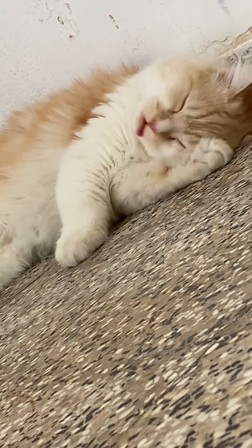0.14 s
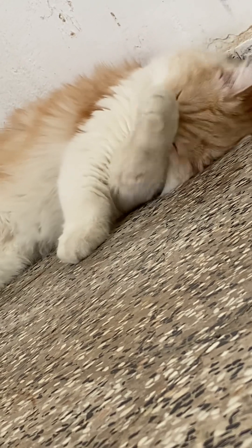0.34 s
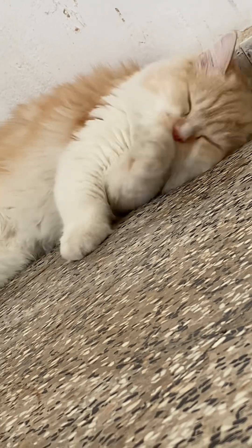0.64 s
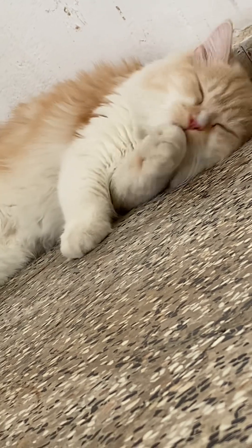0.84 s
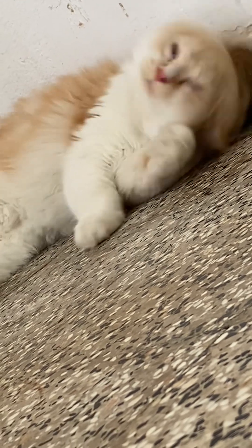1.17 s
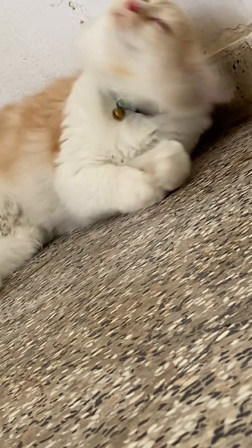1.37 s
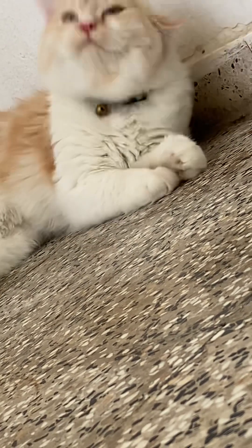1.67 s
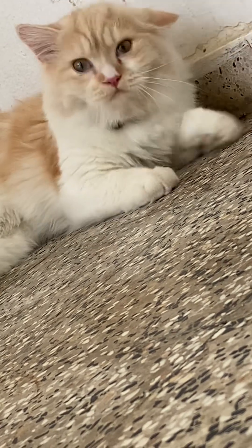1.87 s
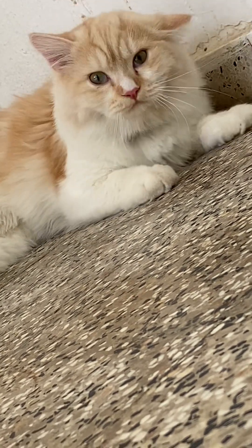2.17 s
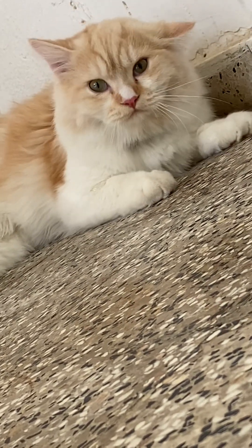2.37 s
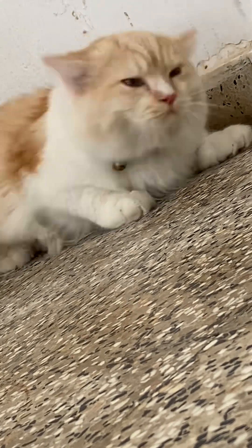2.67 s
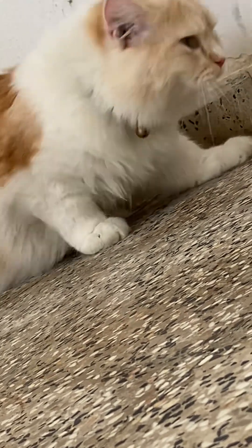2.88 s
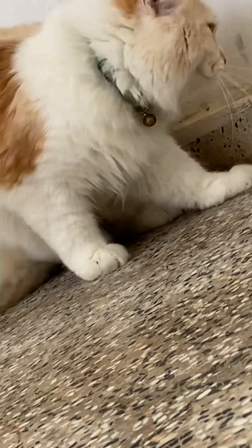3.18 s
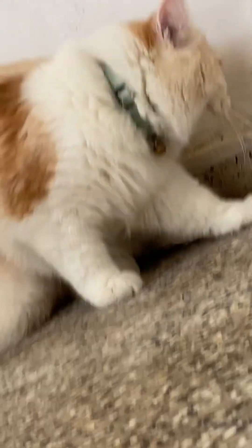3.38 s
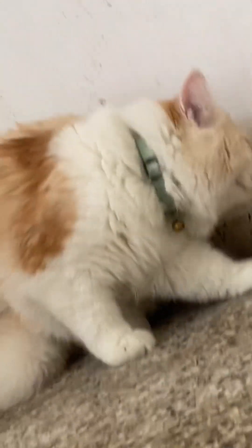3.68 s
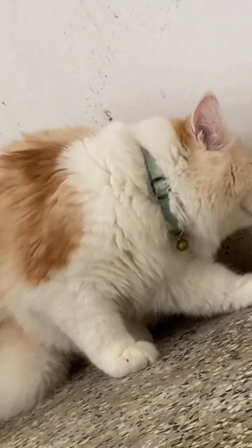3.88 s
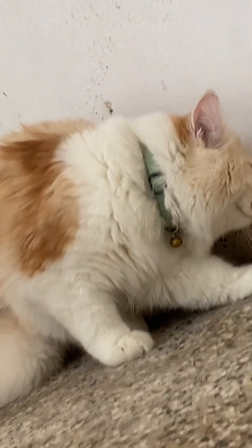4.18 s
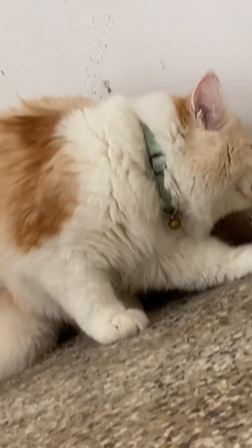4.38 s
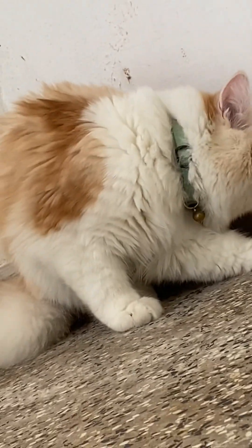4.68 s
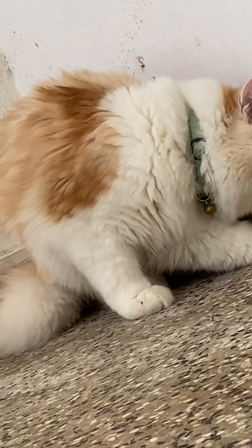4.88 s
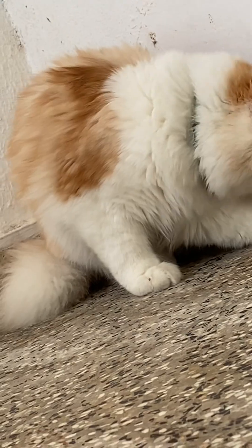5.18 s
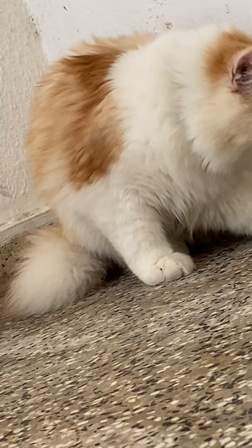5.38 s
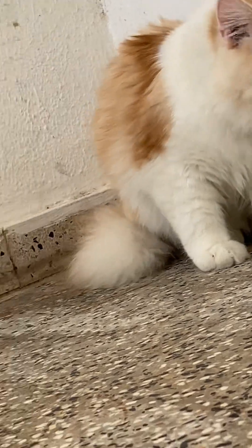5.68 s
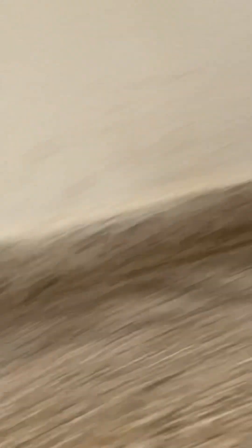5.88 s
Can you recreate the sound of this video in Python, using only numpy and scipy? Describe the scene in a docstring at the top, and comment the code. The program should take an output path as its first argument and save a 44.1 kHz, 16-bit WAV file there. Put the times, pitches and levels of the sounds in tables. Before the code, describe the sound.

Over a low town rumble with faint hiss, a cat's little bell rattles briefly, clinks again more softly, then gives only faint taps.

```python
"""Cat with a collar bell on a stone terrace

A cat close to a stereo microphone grooms itself, jerks its head up, then gets to its feet.
The pellet of its small bell taps and rolls in the brass shell: decaying modes with a fluttering ring.
The bell clacks on its ring as filtered clicks; fur and strap rustle as clumps of tiny noise snaps.
Walls throw the tinkle back as sparse echoes; far behind lie town rumble, machine drones, chirping and hiss."""
import sys
import numpy as np
from scipy import signal
from scipy.fft import rfft, irfft, next_fast_len
from scipy.io import wavfile

SR = 44100
rng = np.random.default_rng(int(sys.argv[2]) if len(sys.argv) > 2 else 0)


def generate_wav(sig):
    """Save sig (samples, or channels by samples) to the path in sys.argv[1] as 16-bit PCM at SR."""
    pcm = np.round(np.clip(np.atleast_2d(sig).T, -1, 1) * 32767).astype(np.int16)
    wavfile.write(sys.argv[1], SR, pcm)


N = 266584
TIME = np.arange(N) / SR
BINS = np.fft.rfftfreq(N, 1 / SR)
LOW_HZ = 4567  # lowest mode of the bell, also the pivot of each clack's brightness

# the bell knocks on its ring and buckle: (time [s], level [dB], brightness [dB per octave])
CLACKS = [(.744, -45, 0), (.926, -53, 0), (1.14, -35, -7), (1.2481, -25.5, -9), (1.266, -35, -1),
          (1.283, -37, 1), (1.303, -33, 4), (1.333, -36, -1), (1.355, -37, 5), (1.403, -33, -15),
          (1.415, -36, -3), (1.441, -38, 7), (1.5236, -5, 3.5), (1.5249, -19.5, -8.5), (1.532, -28, -1),
          (1.785, -41, -12), (2.779, -28, -2), (2.861, -48, 0), (3.068, -39, 0)]


def gain_of(db):
    """Decibels to a factor."""
    return 10 ** (np.asarray(db) / 20)


def evened(x):
    """Scales to rms 1."""
    return x / np.sqrt(np.mean(x ** 2) + 1e-20)


def read(points, hz):
    """Reads a table on a log-frequency axis."""
    f, value = np.transpose(points)
    return np.interp(np.log(hz + 1), np.log(f + 1), value)


def level(rows):
    """Gain over time from a curve in dB."""
    return gain_of(np.interp(TIME, *np.transpose(rows)))


def add(mix, s, sound):
    """Lays a sound into the mix at time s."""
    part = mix[max(round(s * SR), 0):][:len(sound)]
    part += sound[:len(part)]


def fall_60(t, t60):
    """Exponential decay that drops 60 dB in t60 seconds."""
    return np.exp(-np.log(1000) * t / t60)


def drift(rate_hz, size=N):
    """Random wander of rms 1: noise under a Gaussian low-pass."""
    padded = next_fast_len(size, True)
    hz = np.fft.rfftfreq(padded, 1 / SR)
    a, b = rng.standard_normal((2, len(hz))) * np.exp(-(hz / rate_hz) ** 2)
    return evened(irfft(a + 1j * b, padded)[:size])


def coloured(x, colour, size=1024):
    """Causal, minimum-phase filter of unit energy with the given spectrum."""
    hz = abs(np.fft.fftfreq(size, 1 / SR))
    log_gain = np.log(gain_of(np.maximum(read(colour, hz), -100)))
    taps = np.fft.ifft(np.exp(np.conj(signal.hilbert(log_gain)))).real
    return signal.oaconvolve(x, taps / np.linalg.norm(taps))[:N]


def noise_pair(colour, width_db, lifts=()):
    """Two channels of coloured noise; the side part sets how wide it sounds."""
    db = read(colour, BINS)
    for hz, width, lift in lifts:
        db = db + lift / (1 + (2 * (BINS - hz) / width) ** 2)
    mid, side = rfft(rng.standard_normal((2, N))) * gain_of(db)
    side = side * gain_of(width_db)
    return evened(irfft(np.array([mid + side, mid - side]), N))


def swells(rows, width_hz):
    """Short swells of noise in one resonance: a fuzzy tone under a Hann window."""
    out = np.zeros(N)
    for s, length, hz, db in rows:
        t = np.arange(round(length * SR)) / SR
        fuzz = drift(width_hz, size=2 * SR) + 1j * drift(width_hz, size=2 * SR)
        fuzz = fuzz.take(np.arange(len(t)), mode="wrap")
        tone = (fuzz * np.exp(2j * np.pi * hz * t)).real
        add(out, s, gain_of(db) * np.hanning(len(t)) * tone)
    return out


def town():
    """Wide, low town rumble: noise whose level wanders slightly."""
    # relative spectrum of the rumble: (frequency [Hz], density [dB per Hz])
    rumble_colour = [(20, -43), (30, -16.5), (42, -9), (62, -2.5), (85, -13), (125, -13), (230, -12),
                     (320, -19.5), (440, -24), (500, -30.5), (600, -31.5), (800, -30), (1050, -32),
                     (1900, -43.5), (3500, -71.5)]
    # stereo width: (frequency [Hz], side minus mid [dB])
    spread = [(25, -56), (50, -57), (80, -36.5), (110, -31), (200, -25), (380, -13.5), (700, -5.5),
              (1290, -4.5), (2400, -9), (3500, -41.5)]
    # the terrace favours some bands: (frequency [Hz], width [Hz], lift [dB])
    terrace = [(132.6, 19, 1.5), (304.6, 6.2, 4.5), (429, 4.8, 7.5), (524, 31.5, 6), (646, 18.4, 7),
               (736, 30, 6), (785, 35, 4.5), (913, 23, 1.5), (943, 14, 7)]
    rumble = noise_pair(rumble_colour, read(spread, BINS), terrace)
    return gain_of(-37.5) * rumble * gain_of(0.43 * drift(2.7))


def hiss():
    """Faint, narrow noise behind everything, its level following a curve."""
    # relative spectrum: (frequency [Hz], density [dB per Hz])
    hiss_colour = [(1200, -8), (2200, 5), (3200, 6.5), (4300, 1), (5000, 1.5), (6200, -7), (7400, -13.5),
                   (8800, -14), (12000, -15), (13200, -26), (16000, -40.5)]
    # level over time: (time [s], level [dB])
    hiss_level = [(0, -64.5), (2.3, -64.5), (3.8, -64), (5.1, -67), (6.04, -65)]
    return level(hiss_level) * noise_pair(hiss_colour, width_db=-27.5)


def chirps():
    """Faint, diffuse far chirping: swells of narrow noise."""
    # (start [s], length [s], frequency [Hz], level [dB])
    calls = [(2.02, 0.095, 3900, -66), (3.1, 0.1, 3560, -73), (3.4, 2.1, 3170, -73)]
    return swells(calls, width_hz=190)


def drone(hz, wander_hz, db, throb):
    """A far machine tone that wanders in pitch, throbs at random and sometimes surges."""
    # the machine works harder, eases off and picks up again: (time [s], change of the steady part [dB])
    effort = [(0, -1.5), (1.6, 0), (3.4, 2), (4.3, -2), (4.9, -0.5), (5.2, 0.5), (6.04, -0.5)]
    # now and then one drone surges: (peak [s], length [s], frequency of that drone [Hz], level [dB])
    surges = [(0.833, 0.22, 73, -37.5), (2.246, 0.34, 73, -31.5), (2.718, 0.15, 73, -31),
              (3.032, 0.16, 73, -32.5), (3.127, 0.086, 172.5, -35.5), (3.539, 0.11, 172.5, -37.5),
              (3.753, 0.082, 172.5, -37), (5.867, 0.12, 73, -32.5)]
    turns = np.cumsum(hz + wander_hz * drift(6.49)) / SR
    steady = gain_of(db) * level(effort) * evened(1 + throb * drift(15.0))
    surge = np.zeros(N)
    for s, length, surge_hz, surge_db in surges:
        if abs(np.log2(surge_hz / hz)) < .5:  # this surge belongs to this drone
            add(surge, s - length / 2, gain_of(surge_db) * np.hanning(round(length * SR)) ** .5)
    return np.sqrt(2) * np.hypot(steady, surge) * np.sin(2 * np.pi * turns)


def background():
    """Town rumble, two machine drones, hiss and far chirping, summed."""
    # each drone: (frequency [Hz], wander [Hz], level [dB], throb [share of the level])
    deep_drone = (73, 2, -41, 0.33)
    high_drone = (172.5, 3, -46.5, 0)
    return town() + drone(*deep_drone) + drone(*high_drone) + hiss() + chirps()


def walls(x, first_s=0.0065, build_s=0.0031, uneven_db=8, width_db=-16, size=36):
    """Sparse echoes of random sign and strength that build up briefly, the treble dying first."""
    # how long the walls ring: (frequency [Hz], t60 [s])
    ring_times = [(1000, 0.63), (5000, 0.48), (11000, 0.29), (16000, 0.17)]
    taps = np.zeros((2, SR))
    slots = np.arange(round(first_s * SR), SR - size, size)
    at = slots + rng.integers(0, size, (2, len(slots)))  # one echo at a random place in each slot
    strength = gain_of(rng.uniform(-uneven_db, uneven_db, at.shape))
    strength = strength * (1 - np.exp(-at / SR / build_s))
    np.put_along_axis(taps, at, rng.choice([-1, 1], at.shape) * strength, 1)
    hz, t, z = signal.stft(taps, SR, nperseg=256)
    mid, side = signal.istft(z * fall_60(t, read(ring_times, hz)[:, None]), SR)[1]
    tail = mid + gain_of(width_db) * np.array([side, -side])
    return signal.fftconvolve(x[None], tail / np.linalg.norm(mid), axes=1)[:, :N]


def movement(rest_db=-85):
    """Strength of the rubbing: each move grows and fades exponentially."""
    # in order: washing its face (three rubs), the head jerks up, settles, getting up, a step, turning away
    # (peak [s], rise time [s], fall time [s], level [dB])
    moves = [(.29, .06, .06, -76), (.79, 0.13, 0.077, -70), (.95, 0.036, 0.051, -71),
             (1.31, .12, 0.09, -55), (1.66, .1, 0.09, -63), (2.85, 0.17, 0.027, -63),
             (3.08, 0.082, 0.11, -69), (5.82, 0.56, .3, -75.5)]
    power = gain_of(rest_db) ** 2
    for s, rise, fall, db in moves:
        shape = np.exp(-np.maximum((s - TIME) / rise, (TIME - s) / fall))
        power = power + (gain_of(db) * shape) ** 2
    return np.sqrt(power)


def rustle(grains_per_s=3500, spread_db=4, clump_db=5.0, clump_hz=130):
    """Hairs and strap slip in clumps of tiny snaps."""
    # relative spectrum: (frequency [Hz], density [dB per Hz])
    rustle_colour = [(800, -24), (1600, -7.5), (3900, -6), (4700, -5), (6200, -6), (7500, -12),
                     (9000, -8.5), (11200, -15), (13000, -13), (14600, -19), (15600, -16), (16000, -27)]
    sizes = gain_of(spread_db * np.minimum(rng.exponential(1, N), 4)) * rng.choice([-1, 1], N)
    slips = rng.random(N) < grains_per_s / SR
    snaps = sizes * slips * gain_of(clump_db * np.tanh(drift(clump_hz)))
    return movement() * evened(coloured(snaps, rustle_colour))


def scrapes():
    """The bell's ring scrapes in its eye: swells of narrow high noise."""
    # (start [s], length [s], frequency [Hz], level [dB])
    rubs = [(.75, .1, 10050, -75), (.92, .05, 10000, -76), (1.163, .03, 10050, -61),
            (1.15, .05, 12800, -66)]
    return swells(rubs, width_hz=120)


def flaps():
    """The strap slides and flaps against the neck, and a paw ticks twice near 1.84 s: brief swells of broader
    noise."""
    # (start [s], length [s], frequency [Hz], level [dB]); the rows at 1.836 and 1.846 s are paw ticks
    slaps = [(1.247, 0.0045, 3050, -58), (1.261, .005, 5400, -51), (1.2735, 0.0055, 5000, -52),
             (1.3, .004, 5400, -52), (1.305, 0.0044, 5660, -44), (1.3105, .005, 5620, -45),
             (1.316, 0.032, 5380, -54), (1.4, .008, 5600, -60), (1.785, 0.0052, 5600, -57),
             (1.836, .005, 3000, -54), (1.846, 0.0036, 3330, -57), (2.7755, 0.0052, 5570, -46),
             (2.855, 0.028, 5950, -59)]
    return swells(slaps, width_hz=1300)


def clacks(rebound_s=0.00025, rebound=0.13, chatter_db=-26, chatter_s=0.0042):
    """Hard metal contacts: a needle click, a rebound, then brief ring chatter; softer tilts are duller."""
    # relative spectrum before the tilt: (frequency [Hz], density [dB per Hz])
    clack_colour = [(700, -40), (1300, -21.5), (2400, -9), (3900, -9.5), (4650, -2.5), (5500, -6),
                    (6600, -3.5), (8000, -13.5), (9300, -11), (10500, -4), (12300, -1), (14100, -2),
                    (15000, -3), (16000, -19)]
    out, t = np.zeros(N), np.arange(SR // 20) / SR
    for s, db, tilt in CLACKS:
        knock = gain_of(chatter_db) * np.exp(-t / chatter_s) * rng.standard_normal(len(t))
        knock[0] += 1
        knock[round(rebound_s * SR)] += rebound
        colour = [(hz, band_db + tilt * np.log2(hz / LOW_HZ)) for hz, band_db in clack_colour]
        add(out, s, gain_of(db) * coloured(knock, colour))
    return out


def buckle(rattle=0.66, rattle_hz=70):
    """Ring and buckle zing on after each clack, unevenly because they hang loose."""
    # (frequency [Hz], level against the clack before its tilt [dB], t60 [s])
    buckle_modes = [(5510, -55, .2), (6020, -54, .2), (6600, -49, .2), (8690, -60, .2), (9850, -52, .17),
                    (10200, -53, .17), (11950, -54, .18), (15680, -55, .25)]
    out, t = np.zeros(N), np.arange(SR // 3) / SR
    for hz, mode_db, t60 in buckle_modes:
        strength = np.zeros(N)
        for s, db, tilt in CLACKS:
            zing_db = db + mode_db + tilt * np.log2(hz / LOW_HZ)
            add(strength, s, gain_of(zing_db) * fall_60(t, t60))
        tone = np.sin(2 * np.pi * (hz * TIME + rng.random()))
        out += strength * (1 + rattle * drift(rattle_hz)) * tone
    return out


def skips(per_s=80, t60_s=0.084, spread_db=5.5, twins_db=-3):
    """While the bell swings, the pellet skips round the shell in light random taps, as rows of strikes."""
    # (start [s], length [s], level of the low mode [dB])
    runs = [(1.212, .3, -66.5), (2.78, 0.11, -70)]
    rows = []
    for start, length, db in runs:
        chance = rng.standard_normal((64, 4))
        for k, (late, *luck) in enumerate(chance[:round(length * per_s)]):
            mode_db = db + np.array([0, twins_db, twins_db]) + spread_db * np.array(luck)
            rows.append((start + (k + .5 * late) / per_s, 0, *mode_db, t60_s))
    return rows


def bell(wander_hz=16, jolt_turns=0.6, roll=0.28, roll_hz=110, settle=1.84, attack_s=0.00046, trim_db=-1.5):
    """Strikes feed energy to the shell's modes; the rolling pellet makes the ring flutter, fur damps it."""
    # the pellet strikes the shell; where it lands shares out the modes, the fur sets how long it rings
    # (time [s], shift of the low mode [Hz], low mode, lower twin, upper twin [dB before the trim], t60 [s])
    strikes = [(1.105, 0, -80, -62, -76, .03), (1.14, 50, -47, -64, -51, 0.029),
               (1.166, -1, -58, -64, -66, .06), (1.193, 10, -51, -51, -70, 0.043),
               (1.204, 13.5, -49, -45, -66, 0.052), (1.229, 22.5, -51, -59, -60, .06),
               (1.263, -2.5, -51, -64, -64, .05), (1.281, -13, -49, -60, -62, .05),
               (1.2995, 15.5, -47, -50, -55, 0.1), (1.3213, -0.5, -50, -58, -56, .05),
               (1.343, -12, -40, -62, -62, .04), (1.363, -4.5, -61, -55, -66, 0.073),
               (1.399, 21.5, -42, -70, -70, .02), (1.4022, 17, -31.5, -66, -66, 0.011),
               (1.411, 111, -45, -64, -66, 0.031), (1.428, 10.5, -43, -66, -66, .035),
               (1.44, 0, -54, -59, -62, 0.27), (1.451, 14, -49, -65, -67, 0.057),
               (1.5238, 54, -50, -53, -36.5, 0.13), (1.5245, 52, -32, -60, -60.5, .011),
               (1.537, 56, -41, -52, -43, .04), (1.553, 24, -54, -52, -41, .035),
               (1.5675, 36, -37, -65, -59.5, 0.023), (1.592, -1.5, -55, -60, -48, .11),
               (1.615, -14, -44, -64, -58, .06), (1.621, -12.5, -40, -47, -38.5, 0.099),
               (1.646, 4, -48, -60, -40, .045), (1.676, 91, -58, -60, -53, 0.027),
               (1.692, -0.5, -53, -59, -57, .06), (1.708, -0.5, -53, -53, -62, .05),
               (1.7215, 4, -46.5, -61, -54, 0.071), (1.738, 4, -53, -52, -64, .05),
               (1.751, -6, -58.5, -51, -63, 0.27), (1.786, 27, -50, -59, -52.5, 0.11),
               (1.828, 0, -54, -69, -70, .04), (2.777, 14, -46, -72, -59, 0.055),
               (2.806, 0, -51, -74, -56.5, 0.082), (2.833, -4, -65, -73, -58, .1),
               (2.859, -2, -57, -72, -50, .035), (2.88, -1, -59, -74, -64, 0.15),
               (2.92, 1.5, -59, -76, -67, 0.059), (3.01, 3, -78, -73, -67, 0.087),
               (3.1074, -2.5, -74, -61.5, -75, 0.17), (4.4249, 0, -66, -76, -71, .06),
               (5.655, 1, -70, -76, -69, 0.067), (5.7427, -3, -62, -78, -58, 0.063),
               (5.8165, 0, -62, -59.5, -69, 0.055), (5.847, 2, -65, -60, -68, 0.077),
               (5.9, -2, -69, -72, -67, .055), (5.9666, -3, -74, -62.5, -76, .039),
               (6.014, 0, -75, -77, -76, .06)]
    # weak modes of the shell: (frequency [Hz], level against the strongest main mode [dB])
    overtones = [(6210, -30), (10560, -33), (12070, -36), (15410, -33), (15680, -32)]
    lower_twin_hz, upper_twin_hz = 10897, 11128
    # the slot splits the low mode too; the pair beats into a rough buzz
    low_twin_hz, low_twin_db = 4700, -11
    # the chin comes down on the bell and chokes whatever still rings
    choke_s, choke_db_per_s = 1.825, 450

    t = np.arange(SR // 3) / SR
    times, shifts_hz = np.transpose(strikes)[:2]
    latest = np.maximum(np.searchsorted(times, TIME) - 1, 0)
    # each listed strike retunes the low mode
    mode_hz = [LOW_HZ + shifts_hz[latest], lower_twin_hz, upper_twin_hz, low_twin_hz]
    mode_hz += [hz for hz, _ in overtones]
    energy, out = np.zeros((len(mode_hz), N)), np.zeros(N)
    for s, _, *main_db, t60 in strikes + skips():
        # ever faster as the bell sinks into the fur
        decay = np.exp(-np.log(1000) * (t / max(t60, .01)) ** settle)
        shape = decay * (1 - np.exp(-t / attack_s))
        if s < choke_s:
            shape = shape * gain_of(-choke_db_per_s * np.maximum(s + t - choke_s, 0))
        all_db = main_db + [main_db[0] + low_twin_db] + [max(main_db) + db for _, db in overtones]
        for mode, db in zip(energy, all_db):
            add(mode, s, (gain_of(db) * shape) ** 2)
    for mode, hz in zip(energy, mode_hz):
        # the pellet disturbs both strength and phase of the low mode; the high ones ring almost clean
        flutter = 1 + roll * (LOW_HZ / hz) ** 2 * (drift(roll_hz) + 1j * drift(roll_hz))
        turns = np.cumsum(hz + wander_hz * LOW_HZ / hz * drift(26.4)) / SR
        turns += jolt_turns * rng.random(len(times))[latest]  # every listed strike jolts the phase
        out += np.sqrt(mode) * (flutter * np.exp(2j * np.pi * turns)).real
    return gain_of(trim_db) * out


def scene():
    """The cat close by and its echoes over the background."""
    # clack sound thrown sideways to the walls: (frequency [Hz], relative level [dB])
    sideways_colour = [(1500, 3.5), (3000, -7), (4100, -3), (5000, 1.5), (6600, 1.5), (8300, 3.5),
                       (9500, 0.5), (12000, -5), (13000, -10), (14500, -13), (15600, -7)]
    ring, knocks = bell() + buckle(), clacks()
    collar = rustle() + scrapes() + flaps()
    to_walls = gain_of(-12) * ring
    to_walls = to_walls + gain_of(-5.5) * coloured(knocks, sideways_colour)
    to_walls = to_walls + gain_of(-5.5) * collar
    return ring + knocks + collar + walls(to_walls) + background()


def record(dry):
    """Two microphone ports differ a little in level and part in phase toward the treble; then a band limit."""
    # (frequency [Hz], left minus right [dB])
    port_balance = [(0, 0), (90, 0), (170, 1.3), (300, -.2), (700, .8), (1400, 1), (2500, .3), (5000, .2),
                    (12000, .3)]
    # the left port leads the right: (frequency [Hz], phase [radians])
    port_phase = [(0, 0), (3700, 0), (4550, .83), (5050, .2), (6500, 2.3), (7400, 3.14), (8500, 4.2),
                  (9800, 6.1), (11200, 6.8), (12000, 8), (13400, 9.4), (16000, 11.2)]
    edge_hz = 16300
    balance = gain_of(np.array([[.5], [-.5]]) * read(port_balance, BINS))
    lag = np.exp(1j * np.array([[0], [-1]]) * read(port_phase, BINS))
    ports = irfft(rfft(dry) * balance * lag, N)
    low_pass = signal.firwin(511, edge_hz, window=("kaiser", 9), fs=SR)
    return signal.oaconvolve(ports, low_pass[None], "same")


dry = scene()
out = record(dry)
generate_wav(out)
```